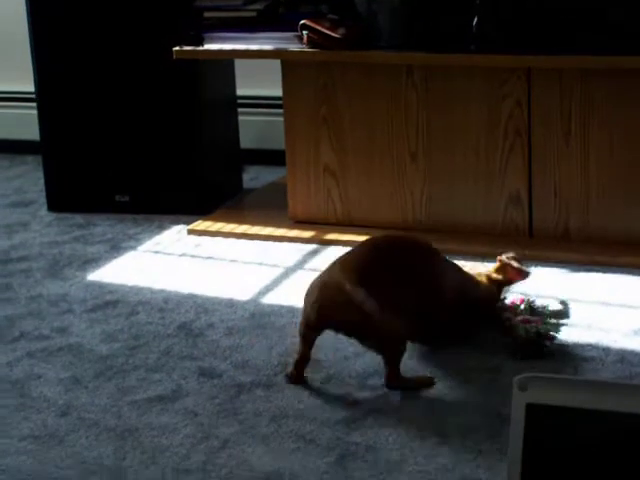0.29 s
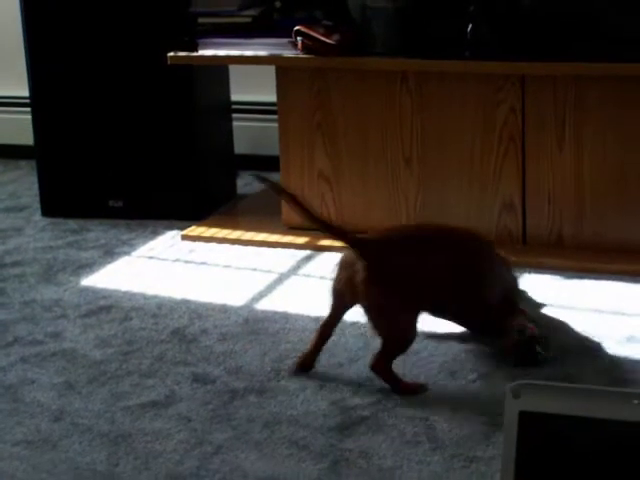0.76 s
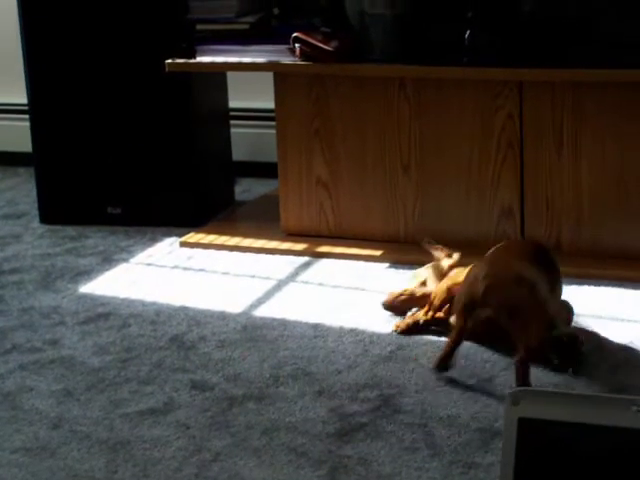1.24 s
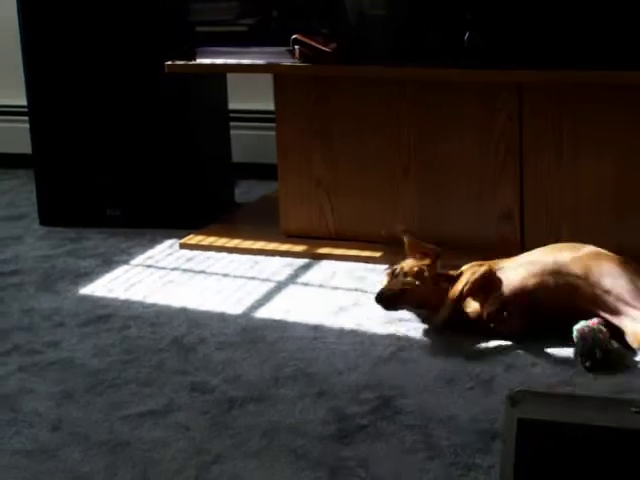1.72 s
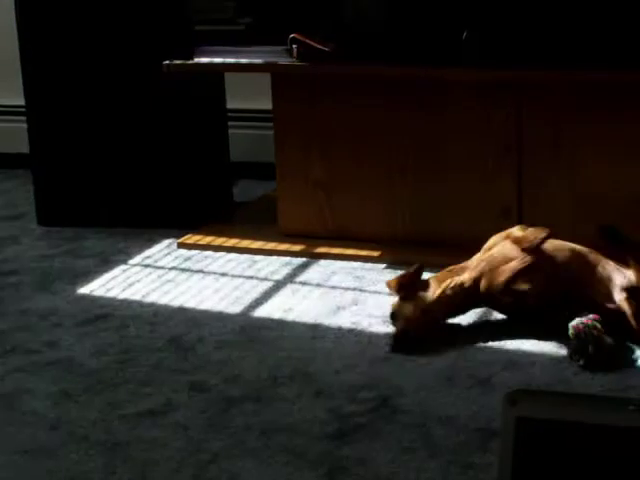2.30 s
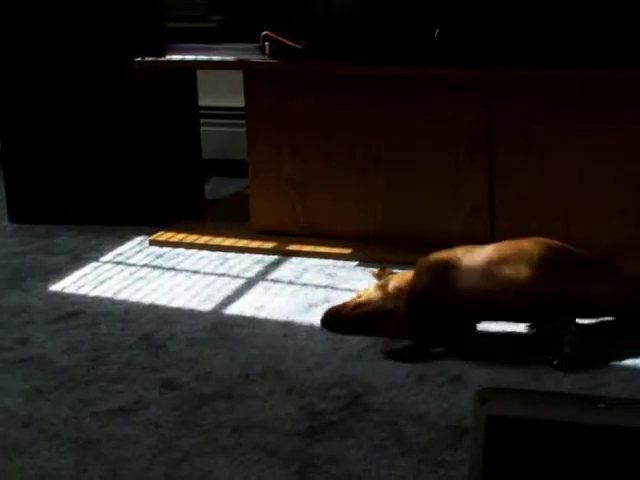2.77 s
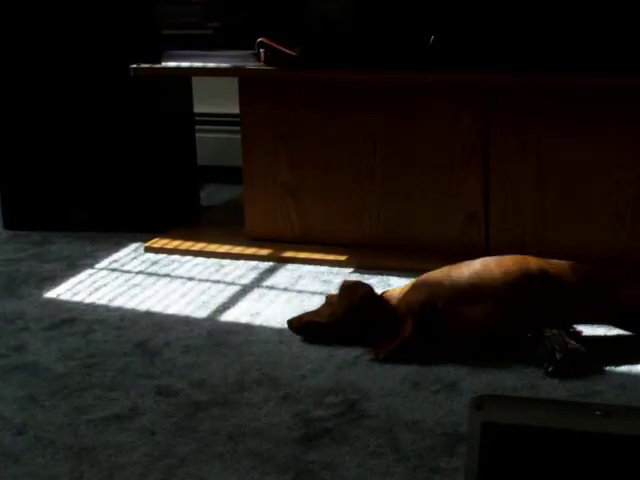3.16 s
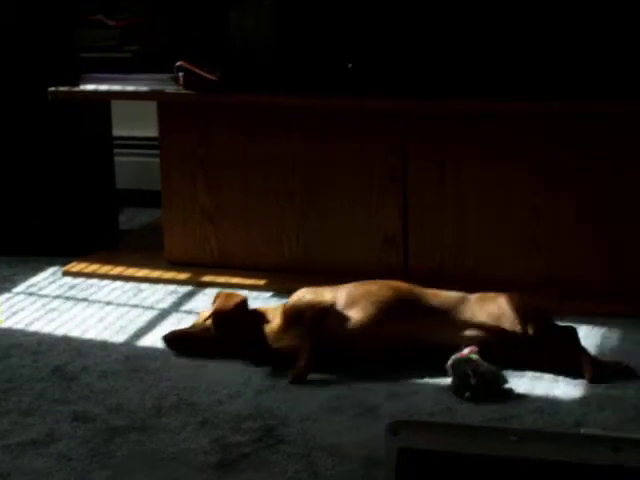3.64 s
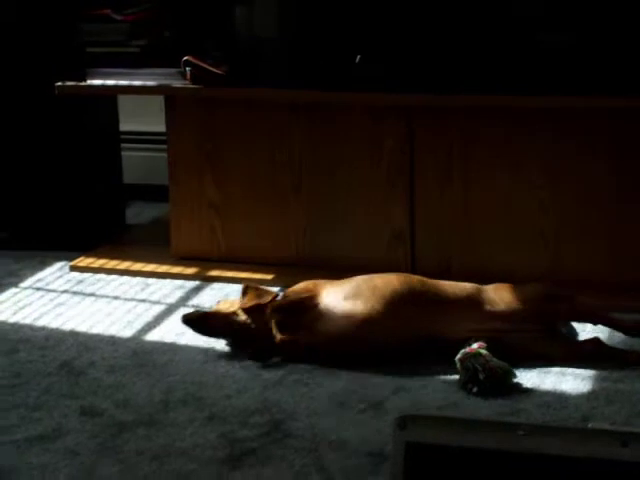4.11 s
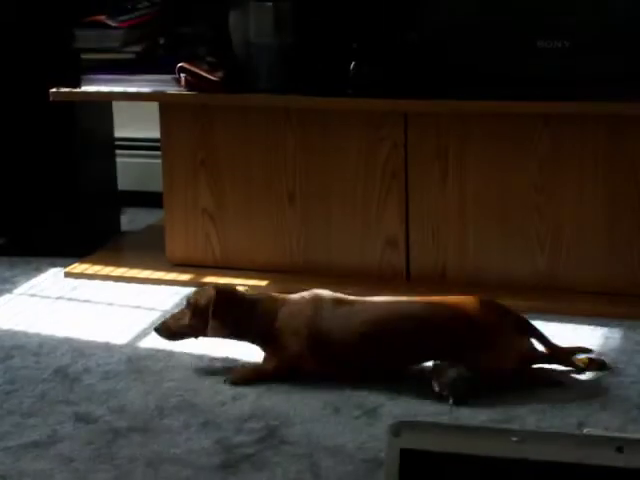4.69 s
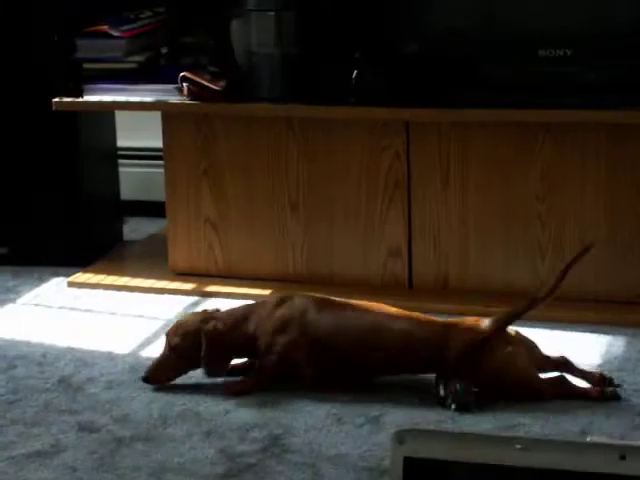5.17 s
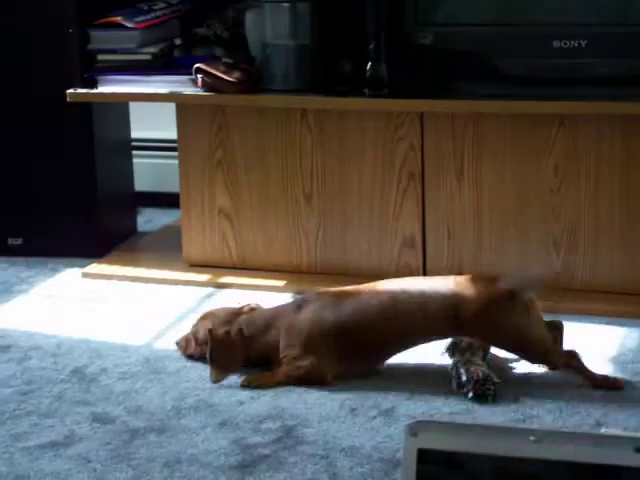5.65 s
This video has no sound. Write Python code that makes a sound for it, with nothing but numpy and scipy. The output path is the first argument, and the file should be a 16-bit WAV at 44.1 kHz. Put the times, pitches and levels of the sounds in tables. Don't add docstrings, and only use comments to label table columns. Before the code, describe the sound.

Close, hissy small microphone with low handling bumps. A dog shuffles across the room on carpet, very softly, with a sharp claw tick early and a cluster of scrapes and thumps near the middle. One dry springy plastic click comes at a third of the way; two much louder clattering snaps come near the end, with a short room tail.

```python
import sys
import numpy as np
from scipy import signal
from scipy.fft import rfft, irfft
from scipy.io import wavfile

SR = 44100
rng = np.random.default_rng(int(sys.argv[2]) if len(sys.argv) > 2 else 0)


def decibels_to_gain(level_db):
    exponent = np.asarray(level_db, float) / 20
    return 10 ** exponent


def to_wav(s):
    ch = np.atleast_2d(s).T
    pcm = np.round(np.clip(ch, -1, 1) * 32767)
    wavfile.write(sys.argv[1], SR, pcm.astype(np.int16))


N = 260190


def rms_one(x):
    return x / np.sqrt(np.mean(x ** 2) + 1e-20)


def shaped(x, points):
    hz, db = np.transpose(points)
    bins = np.arange(N // 2 + 1) * SR / N + 1
    gain_db = np.interp(np.log(bins), np.log(hz), db, left=-90, right=-90)
    return rms_one(irfft(rfft(x) * decibels_to_gain(gain_db), N))


def resonate(x, hz, width_hz):
    r = np.exp(-np.pi * width_hz / SR)
    zeros = [(1 - r * r) / 2, 0, (r * r - 1) / 2]
    poles = [1, -2 * r * np.cos(2 * np.pi * hz / SR), r * r]
    return signal.lfilter(zeros, poles, x)


def ring(x, hz, t60):
    r = decibels_to_gain(-60 / (t60 * SR))
    w = 2 * np.pi * hz / SR
    return signal.lfilter([0, np.sin(w)], [1, -2 * r * np.cos(w), r * r], x + 1e-18)


def add(out, s, x):
    i = round(s * SR)
    out[i:i + len(x)] += x[:N - i]


def grains(per_s, spread_db):
    sizes_db = spread_db * np.minimum(rng.exponential(1, N), 5)
    sizes = decibels_to_gain(sizes_db) * rng.choice([-1, 1], N)
    return sizes * (rng.random(N) < per_s / SR)


def swells(at_s, length_s, db, rest_db):
    t = np.arange(0, N + 64, 64) / SR
    power = decibels_to_gain(rest_db) ** 2
    for s, width, level_db in zip(at_s, length_s, db):
        power = power + decibels_to_gain(level_db) ** 2 * np.exp(-((t - s) / width) ** 2)
    return np.interp(np.arange(N) / SR, t, np.sqrt(power))


def slips(table):
    out, click = np.zeros(N), np.eye(1, 800)[0]
    for s, peak_db, hz, width_hz in table:
        tick = click
        for _ in range(3):
            tick = resonate(tick, hz, width_hz)
        add(out, s, decibels_to_gain(peak_db) * tick / np.abs(tick).max())
    return out


# pitch_hz, level_db
HISS_SPECTRUM = [(12, -37.5), (20, -25), (60, -2.5), (85, -13), (125, -13), (170, -17), (230, -14),
                 (450, -24), (750, -18.5), (1900, -23.5), (4000, -22.5), (6000, -33.5), (8000, -25),
                 (11000, -43.5)]
# pitch_hz, level_db
SWAY_SPECTRUM = [(15, -1.5), (25, -2.5), (35, 4), (48, -5.5), (70, -36)]
# peak_s, level_db, length_s
HAND_PUSHES = [(0.0, -48.5, 0.043), (.28, -46.5, 0.022), (0.395, -54.5, 0.036), (.62, -65, .04),
               (.87, -60, .03), (1.172, -47.5, 0.034), (1.62, -55.5, .06), (2.01, -53, .045),
               (2.3, -58, .04), (2.957, -46, 0.045), (4.09, -62, 0.046), (4.36, -64, .04),
               (4.768, -52, .035), (4.9, -58, .03), (5.098, -48.5, 0.032), (5.57, -59, 0.053)]


def background():
    hiss = decibels_to_gain(-49.5 - 1.77) * shaped(rng.standard_normal(N), HISS_SPECTRUM)

    hum_hz, hum_width_hz, hum_db = 59.65, 7.8, -56
    hum = resonate(rng.standard_normal(N), hum_hz, hum_width_hz)
    hum = resonate(hum, hum_hz, 3 * hum_width_hz)
    hum = hum / (np.abs(signal.hilbert(rms_one(hum))) + 0.8)

    s, db, length_s = np.transpose(HAND_PUSHES)
    sway = shaped(rng.standard_normal(N), SWAY_SPECTRUM)
    sway = rms_one(sway / (np.abs(signal.hilbert(sway)) + 0.36))
    return hiss + decibels_to_gain(hum_db) * rms_one(hum) + swells(s, length_s, db, rest_db=-68) * sway


def room(x):
    t60_s, level_db = 0.26, -30.5
    t = np.arange(SR // 3) / SR
    tail = rng.standard_normal(len(t)) * decibels_to_gain(-60 * t / t60_s)
    tail = tail * (t > 0.004)
    tail = signal.lfilter([0.45], [1, -0.55], tail)
    tail = tail / np.sqrt(np.sum(tail ** 2))
    return decibels_to_gain(level_db) * signal.fftconvolve(x, tail)[:N]


# pitch_hz, level_db
RUSTLE_SPECTRUM = [(900, -18), (1500, -7), (2500, -7), (3300, -3.5), (4100, 1.5), (5000, -6.5), (6500, -16),
                   (8500, -33)]
# pitch_hz, level_db
SCUFF_SPECTRUM = [(80, -6.5), (130, -5.5), (250, -2.5), (450, -2.5), (900, -17.5), (1600, -14)]
# peak_s, length_s, rustle_db, scuff_db
WEIGHT_SHIFTS = [(0.0, 0.12, -56, -62), (0.272, 0.046, -52.5, -53), (0.558, 0.23, -58, -57.5),
                 (0.733, 0.033, -59, -57), (0.934, 0.052, -51.5, -56.5), (1.157, .08, -51.5, -56.5),
                 (1.486, 0.09, -53, -61.5), (1.7, 0.043, -54.5, -59.5), (1.86, 0.075, -52, -72),
                 (2.655, 0.16, -54, -59), (2.91, 0.073, -52, -57), (3.103, 0.083, -55.5, -60),
                 (3.505, 0.23, -53.5, -62), (3.72, 0.26, -55, -57), (4.092, 0.04, -50, -63),
                 (4.35, 0.077, -51.5, -64), (4.7, 0.15, -52, -57.5), (4.866, 0.038, -55, -53),
                 (5.096, 0.13, -48, -55), (5.545, 0.19, -53, -68), (5.75, 0.085, -53.5, -61)]


def fur():
    s, length_s, rustle_db, scuff_db = np.transpose(WEIGHT_SHIFTS)
    rustle = shaped(grains(9000, spread_db=1.5), RUSTLE_SPECTRUM)
    scuff = shaped(grains(1500, spread_db=3.0), SCUFF_SPECTRUM)
    rustle = rustle * swells(s, length_s, rustle_db, rest_db=-59.5)
    return rustle + scuff * swells(s, length_s, scuff_db, rest_db=-62)


# start_s, length_s, level_db, pitch_hz, width_hz
ROPE_DRAGS = [(0.193, 0.16, -51.5, 109, 60), (0.262, .05, -50.5, 3300, 2000),
              (0.418, 0.077, -49, 2960, 2500), (0.451, 0.045, -52, 2000, 600), (1.135, 0.055, -52, 65, 40),
              (1.449, 0.077, -50, 2760, 2500), (1.453, 0.068, -53, 4100, 600),
              (1.454, 0.049, -54, 1030, 150), (2.656, 0.045, -48.5, 326, 350),
              (3.568, 0.027, -52, 3500, 1800), (3.795, 0.022, -42, 3300, 2000),
              (3.799, 0.045, -49, 1300, 2000), (3.805, 0.032, -52, 5600, 3000),
              (3.808, 0.032, -37.5, 3100, 1000), (3.808, 0.024, -41.5, 4700, 900),
              (3.823, 0.063, -44.5, 3350, 1800), (4.06, 0.065, -48, 3600, 1700),
              (4.076, 0.045, -55, 420, 100), (4.288, 0.027, -49.5, 1500, 2000),
              (4.305, 0.068, -53, 2190, 3000), (5.402, 0.032, -53, 2940, 2310),
              (5.03, .1, -52.5, 2800, 2500)]


def drags():
    out, friction = np.zeros(N), grains(3000, spread_db=3.0)
    for s, length_s, db, hz, width_hz in ROPE_DRAGS:
        phase = np.arange(round(3.5 * length_s * SR)) / SR / length_s
        start = round(s * SR)
        scrape = resonate(friction[start:start + len(phase)], hz, width_hz)
        scrape = resonate(scrape, hz, 0.94 * width_hz)
        envelope = np.minimum(phase / 0.06, 1) * np.exp(-1.4 * phase ** 2)
        add(out, s, decibels_to_gain(db) * rms_one(scrape) * envelope)
    return out


# start_s, peak_db, pitch_hz, width_hz
CLAW_TICKS = [(0.4005, -37.5, 2400, 800), (.4004, -34.5, 5600, 2000), (.4006, -16.5, 3740, 990),
              (.706, -37.5, 734, 800), (3.558, -29, 1400, 900), (3.5585, -33, 2050, 500),
              (3.559, -33, 600, 500), (3.7965, -34, 3000, 3000), (3.8125, -41, 4860, 940),
              (4.2865, -30, 3950, 1300), (4.287, -35, 3000, 600), (4.287, -36.5, 925.9, 746),
              (4.2875, -36, 1900, 700), (4.296, -39, 1030, 648.1), (4.529, -34, 400, 500),
              (4.5295, -32, 4000, 650)]


def ticks():
    return slips(CLAW_TICKS)


# start_s, peak_db, pitch_hz, t60_s, puff_db
FLOOR_THUMPS = [(0.234, -37.5, 273, 0.03, 0), (0.29, -42, 250, 0.046, -5), (0.704, -37.5, 193, 0.036, 0),
                (2.679, -35.5, 258, 0.03, 2), (3.529, -35.5, 320, 0.025, 2), (3.557, -30, 187, 0.035, 3),
                (3.714, -40.5, 447, 0.019, 12), (3.796, -28.5, 400, 0.03, -5),
                (3.811, -33, 413, 0.049, 1.5), (4.348, -43, 316, 0.056, -2), (4.522, -35, 230, 0.03, -3),
                (4.528, -30, 190, 0.044, -9), (5.43, -30.5, 254, 0.031, -8)]


def thumps():
    out, t = np.zeros(N), np.arange(SR // 8) / SR
    for s, peak_db, hz, t60, puff_db in FLOOR_THUMPS:
        body = 1.48 * np.sin(2 * np.pi * hz * t)
        body += 0.5 * np.sin(2 * np.pi * 2.196 * hz * t)
        body += 0.73 * np.sin(2 * np.pi * 0.62 * hz * t)
        puff = resonate(rng.standard_normal(len(t)), 680, 1200) * decibels_to_gain(puff_db + 9.0)
        envelope = decibels_to_gain(-60 * t / t60) * (1 - np.exp(-t / 0.0044))
        add(out, s, decibels_to_gain(peak_db) * envelope * (body + puff))
    return out


SPRING_SET_OFF_S = [
    1.893,
    5.161,
    5.4555,
]
# pitch_hz, t60_s, first_snap_db, second_snap_db, third_snap_db
SPRING_MODES = [(736, 0.8, -51, -54, -72), (880, 0.21, -45, -40, -40.5), (1685, 0.3, -64, -61, -45),
                (1770, 0.75, -50, -48.5, -49), (1825, 0.13, -34, -57, -64), (2008, 0.37, -52, -47, -49),
                (2250, 0.58, -53, -60, -60), (2660, 0.24, -39, -36, -30), (4172, .2, -58, -55, -58),
                (4420, .4, -58, -49, -63), (6300, .3, -56, -52, -55), (7203, .4, -68, -62, -59)]


def spring():
    out, at = np.zeros(N), [round(s * SR) for s in SPRING_SET_OFF_S]
    for hz, t60, *strength_db in SPRING_MODES:
        clicks = np.zeros(N)
        clicks[at] = decibels_to_gain(np.array(strength_db))
        out += ring(clicks, hz, t60)
    return out


# start_s, peak_db, pitch_hz, width_hz
SHELL_FLEXES = [
    (1.8895, -24, 736, 350),
    (1.8912, -23.5, 1340, 500),
    (1.8962, -33, 788, 300),
    (5.1409, -3.5, 1520, 597),
    (5.1424, -10.5, 2790, 800),
    (5.1438, -7.5, 2070, 700),
    (5.4335, -19, 974, 406),
    (5.4545, -3, 1760, 1000),
    (5.4562, -6.5, 2040, 600),
]


def flexes():
    return slips(SHELL_FLEXES)


# pitch_hz, level_db,
# t60_s
SHELL_LOW_TO_MID = [(708, -17.5, 0.033), (865, -9.5, 0.021), (1070, -10.5, 0.011), (1410, -8.5, 0.026),
                    (1644, 0, 0.015), (2000, 0.5, 0.023), (2220, 0.5, 0.017),
                    (2300, -2.5, 0.019), (2714, 1, 0.015), (2852, 1.5, 0.016), (3300, 0.5, 0.007),
             (3600, 1.5, 0.0072)]
SHELL_UPPER = [(3900, 1, 0.0083), (4174, -2.5, 0.028), (4330, -4.5, 0.012), (4680, -7.5, 0.025),
               (5280, -6.5, 0.0064)]
SHELL_HIGH = [(5600, -8.5, 0.016), (5830, 2, 0.0042), (6570, -3.5, 0.0087), (7060, -7.5, 0.011),
              (8230, 1, 0.0023)]
# start_s, strength_db, brightness_db (highest modes over lowest), tongue_db (extra)
SNAP_CONTACTS = [(1.8872, -25, 7, 9), (1.8891, -17, 3.5, 6.5), (1.8917, -17, -4, -1),
                 (1.8932, -15.5, 14.5, 0), (1.8964, -25, -9.5, 3), (1.9, -33, -10, 2),
                 (5.14, -26.5, 14, -6), (5.1411, -14, 0, 0), (5.1415, -14.5, 7, 2.5), (5.147, -21.5, 3, 4),
                 (5.1482, -15.5, 3, 1), (5.1522, -29, -16, 6), (5.158, -26, 2.5, 1),
                 (5.1595, -11.5, 7.5, -11), (5.1613, -13.5, 3, -1.5), (5.164, -15, 3, 0),
                 (5.167, -24, -5, 8), (5.4273, -16.5, 9, -3), (5.4292, -15.5, -5.5, 8),
                 (5.4326, -12, 5, -8), (5.434, -22, -1, -8), (5.4375, -12.5, 6, 4.5), (5.44, -17.5, -4, 1),
                 (5.4433, -14, 5, -5), (5.4454, -14.5, 2, -11), (5.449, -24, 2, 3), (5.4545, -19, 10, -3),
                 (5.4569, -12.5, 2, 1), (5.4605, -22, -3, 2.5), (5.464, -33, -6, 3)]


def snaps():
    rattle_s, bright_pivot_hz, mode_chance_db = 0.0022, 2900, 1.1
    out, t = np.zeros(N), np.arange(SR // 16) / SR
    for s, strength_db, bright_db, tongue_db in SNAP_CONTACTS:
        tongue = [(hz, db + tongue_db, t60) for hz, db, t60 in SHELL_UPPER]
        modes = SHELL_LOW_TO_MID + tongue + SHELL_HIGH
        chance = rng.standard_normal((2, 600))
        hit = np.zeros(len(t))
        hit[:600] = 0.15 * chance[0] * np.exp(-t[:600] / rattle_s)
        hit[0] = 1
        contact = np.zeros(len(t))
        for k, (hz, db, t60) in enumerate(modes):
            tilt_db = bright_db / 2 * np.tanh(3.4 * np.log(hz / bright_pivot_hz))
            mode_db = strength_db + db + tilt_db + mode_chance_db * chance[1, k]
            contact += decibels_to_gain(mode_db) * (-1) ** k * ring(hit, hz, t60)
        add(out, s - 0.0004, contact)
    return 0.5 * signal.sosfilt(signal.butter(2, 480, "high", fs=SR, output="sos"), out)


def scene():
    close = snaps() + flexes() + spring()
    dog = thumps() + ticks() + drags()
    wet = room(close + decibels_to_gain(11) * dog)
    return (close + dog + wet + fur() + background())[None]


def roll_off(x):
    return signal.sosfilt(signal.butter(12, 9300, fs=SR, output="sos"), x)


def record(dry):
    ceiling = 0.72
    rounded = ceiling * np.tanh(dry / ceiling)
    cut = signal.sosfilt(signal.cheby2(7, 52, 9694, fs=SR, output="sos"), rounded)
    cut = signal.sosfilt(signal.butter(10, 9800, fs=SR, output="sos"), cut)
    return roll_off(cut)


dry = scene()
out = record(dry)
to_wav(out)
```